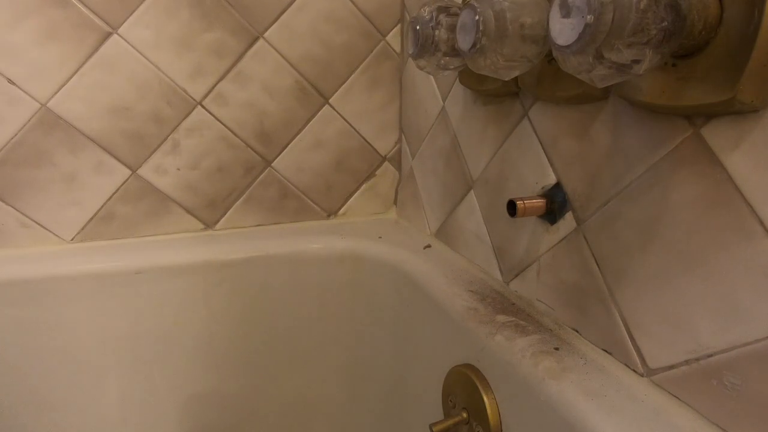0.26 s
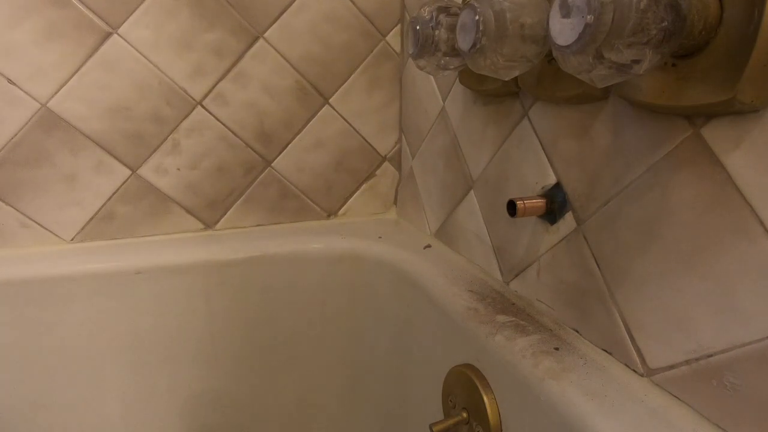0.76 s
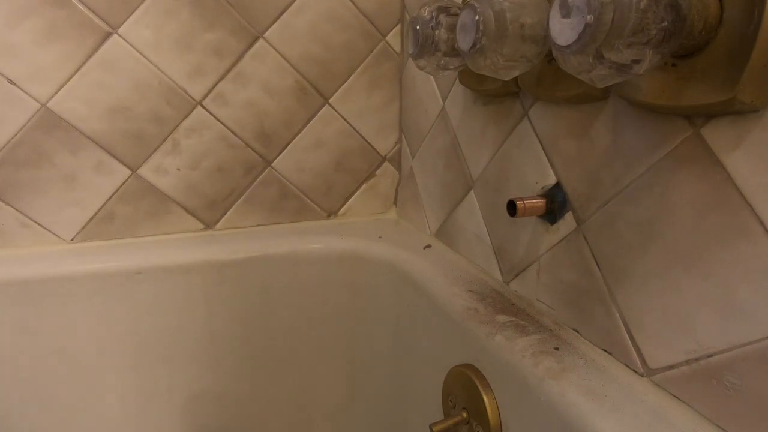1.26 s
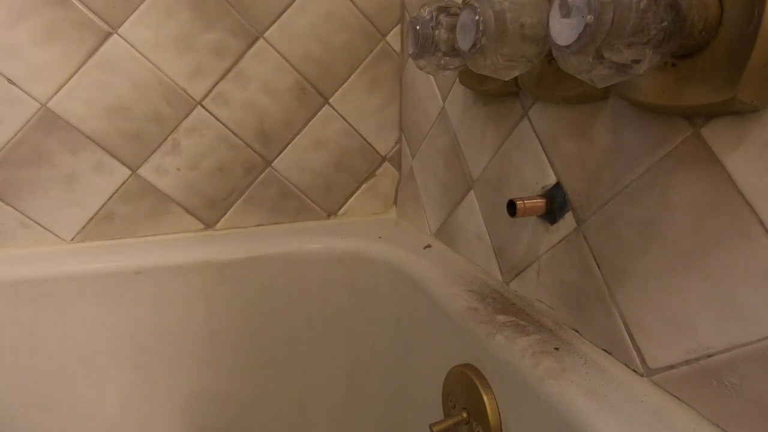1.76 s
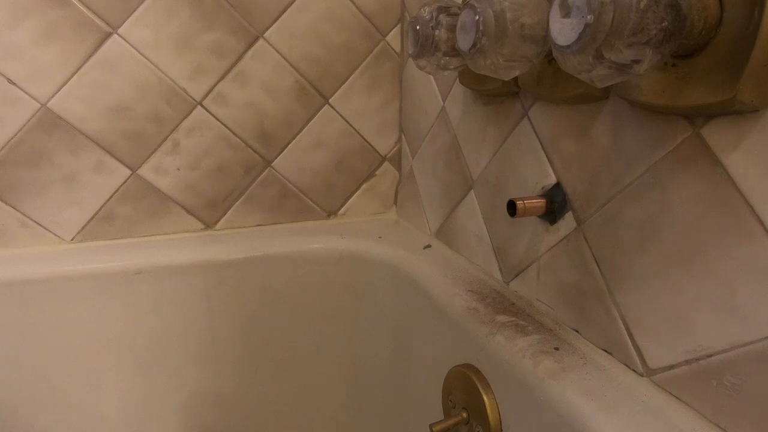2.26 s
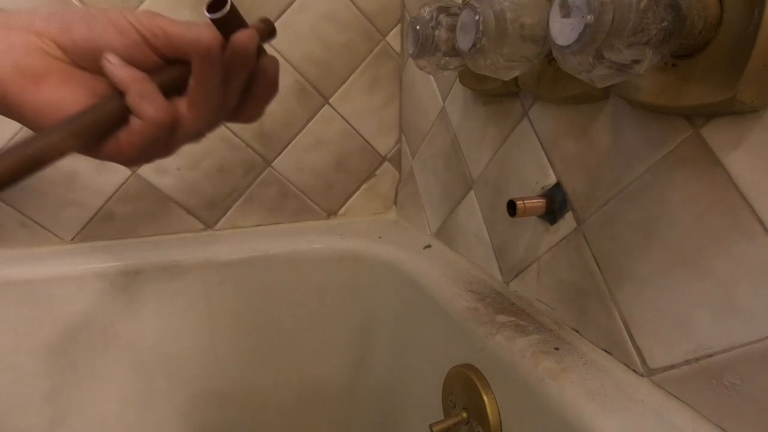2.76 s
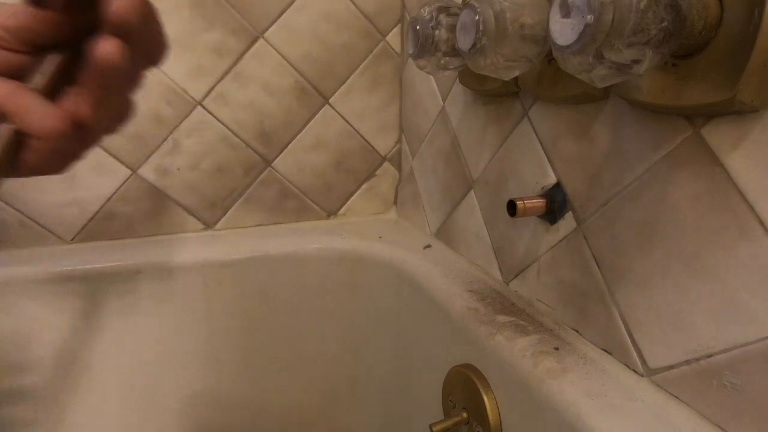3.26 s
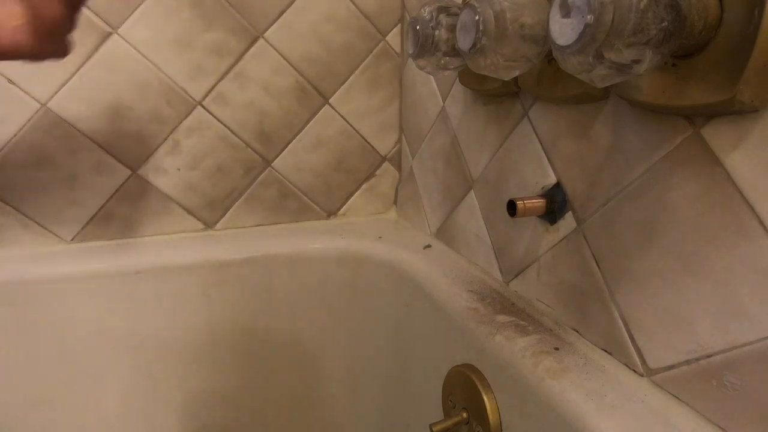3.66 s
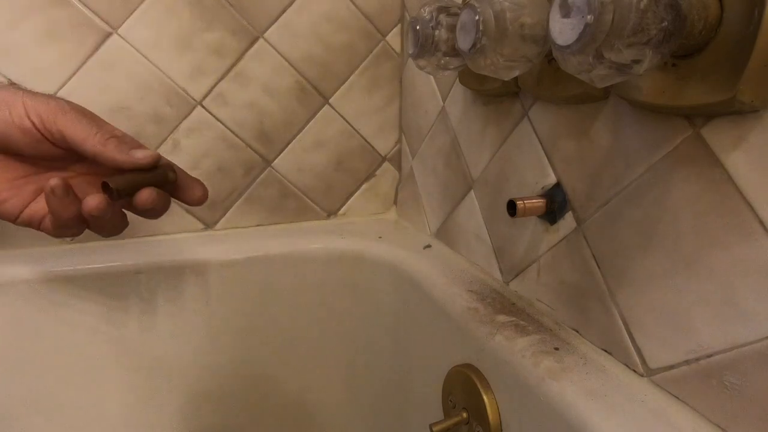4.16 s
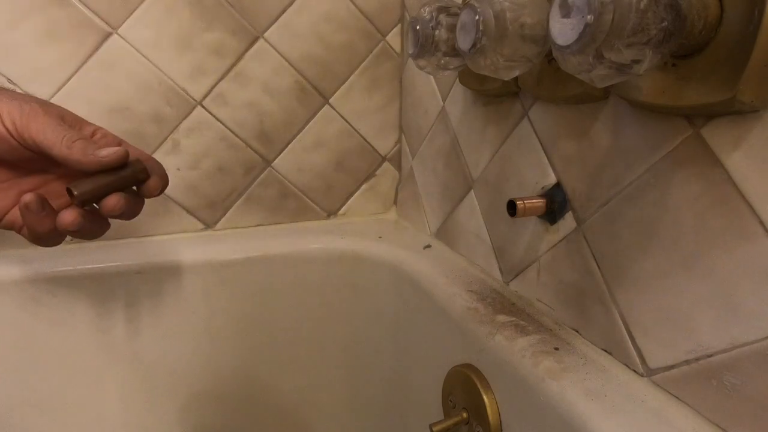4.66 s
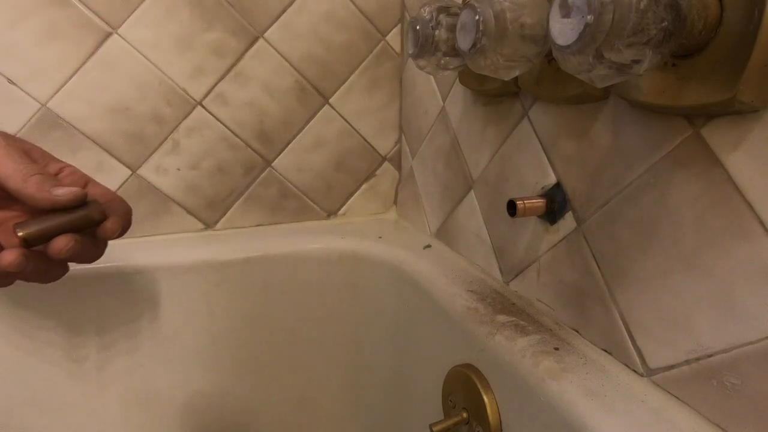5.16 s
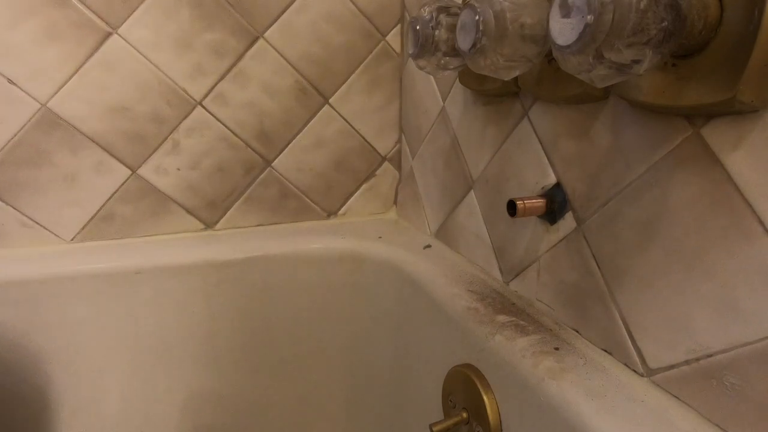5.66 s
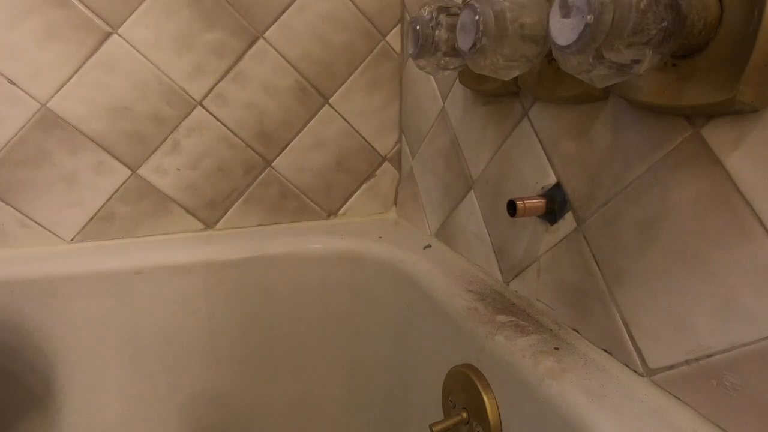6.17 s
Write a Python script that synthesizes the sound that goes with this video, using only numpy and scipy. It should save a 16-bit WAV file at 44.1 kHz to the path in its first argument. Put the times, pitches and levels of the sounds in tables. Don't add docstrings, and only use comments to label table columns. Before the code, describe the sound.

In a small tiled bathroom, metallic clicks and a hard pipe knock lead to two short singing scrapes on enamel, over deep building hum.

```python
import sys
import numpy as np
from scipy import signal
from scipy.fft import rfft, irfft, next_fast_len
from scipy.io import wavfile
from scipy.ndimage import uniform_filter1d, minimum_filter1d

SR = 44100
rng = np.random.default_rng(int(sys.argv[2]) if len(sys.argv) > 2 else 0)


def unload_wav(signal):
    wavfile.write(
        sys.argv[1],
        SR,
        np.round(np.clip(np.atleast_2d(signal).T, -1, 1) * 32767).astype(np.int16),
    )


def to_linear_factor(level_db):
    exponent = np.asarray(level_db, float) / 20
    return 10 ** exponent


N = 282681
TIME = np.arange(N) / SR
SIZE = next_fast_len(N + SR)
HZ = np.maximum(np.arange(SIZE // 2 + 1) * SR / SIZE, 1)
TREMOR = 1e-9 * rng.standard_normal(N)


def rms_one(x):
    return x / np.sqrt(np.mean(x ** 2) + 1e-20)


def filtered(x, order, hz, kind="low"):
    return signal.sosfilt(signal.butter(order, hz, kind, fs=SR, output="sos"), x)


def at_hz(rows, hz):
    f, *columns = np.transpose(rows)
    return [np.interp(np.log(hz), np.log(f), c) for c in columns]


def colour(x, spectrum):
    cepstrum = irfft(np.log(to_linear_factor(at_hz(spectrum, HZ)[0])), SIZE)
    cepstrum[1:SIZE // 2] *= 2
    cepstrum[SIZE // 2 + 1:] = 0
    gain = np.exp(rfft(cepstrum))
    gain = gain / np.sqrt(np.mean(abs(gain) ** 2))
    return irfft(rfft(x, SIZE) * gain, SIZE)[:N]


def resonance(x, hz, width):
    r = np.exp(-np.pi * width / SR)
    zeros = np.sqrt((1 - r * r) / 2) * np.array([1, 0, -1])
    poles = [1, -2 * r * np.cos(2 * np.pi * hz / SR), r * r]
    return signal.lfilter(zeros, poles, x + TREMOR[:len(x)])


def drift(hz):
    return rms_one(filtered(rng.standard_normal(N + SR), 2, hz)[SR:])


def grains(per_s, spread_db):
    sizes = to_linear_factor(spread_db * np.minimum(rng.exponential(1, N), 5)) * rng.choice([-1, 1], N)
    return rms_one(sizes * (rng.random(N) < per_s / SR))


def contacts(times, levels_db, length, rough):
    jolts, blows, age = np.zeros(N + SR), np.zeros(N), TIME[:SR // 5]
    for s, db in zip(times, levels_db):
        jolts[int(s * SR):][:len(age)] += to_linear_factor(db) * np.exp(-age / length)
        blows[int(s * SR)] += to_linear_factor(db) * np.sqrt(length * SR / 2)
    return rough * jolts[:N] * rng.standard_normal(N) + np.sqrt(1 - rough ** 2) * blows


def swells(rows):
    s, half, db = np.transpose(rows)[:3, :, None]
    return db - 12 * (abs(TIME - s) / half) ** 1.5


def stroke(start, hold, db):
    landing_s, lift_db_per_s = 0.0077, 332.5
    landing = 45 * np.maximum(start - TIME, 0) / landing_s
    return db - landing - lift_db_per_s * np.maximum(TIME - start - hold, 0)


def loudest(levels_db, *traits):
    lead = np.argmax(levels_db, axis=0)
    lent = [uniform_filter1d(np.asarray(trait, float)[lead], size=400) for trait in traits]
    return [np.max(levels_db, axis=0)] + lent


# f/Hz, level/dB per Hz
HUSH = [(20, -19.5), (54, -4.5), (111, -1.5), (147, -23.5), (225, -25), (377, -35.5), (571, -51.5),
        (818, -41.5), (1020, -51.5), (2400, -59), (5000, -60), (6100, -58), (7500, -65.5), (13000, -71.5),
        (14000, -90.5)]


def hush():
    out = to_linear_factor(-40.5) * np.array([colour(rng.standard_normal(N), HUSH) for field in range(2)])
    low_band = signal.butter(2, [48, 130], "band", fs=SR, output="sos")
    return out - 0.72 * signal.sosfiltfilt(low_band, out)


# t/s, half length/s, level/dB, f/Hz
FIRST_MODE_SWELLS = [(0.02, .07, -34.5, 62.2), (.46, .07, -40.5, 57.1), (.61, 0.041, -32, 65.5),
                     (.86, 0.19, -38.5, 62.4), (1.23, 0.031, -30, 62), (1.52, 0.11, -43.5, 60.76),
                     (1.75, .12, -46, 59.3), (2.0, .14, -37.5, 65.4), (2.31, .05, -47.5, 69.97),
                     (2.51, .08, -33.5, 64.6), (2.6, .06, -31.5, 72), (2.78, 0.13, -37, 63),
                     (3.0, 0.073, -34.5, 64.16), (3.18, .04, -37.5, 61.6), (3.41, 0.0496, -43, 61.03),
                     (3.62, 0.028, -53.5, 61.95), (3.95, 0.091, -37, 63), (4.22, 0.078, -37, 63.82),
                     (4.53, .13, -39, 64.74), (4.75, .06, -38.5, 66), (5.47, 0.14, -46.5, 65),
                     (5.77, 0.044, -34, 64.47), (5.93, .06, -33.5, 62.6), (6.2, 0.12, -45, 57),
                     (6.41, 0.088, -29.5, 52)]
# t/s, half length/s, level/dB, f/Hz
SECOND_MODE_SWELLS = [(0.001, 0.033, -39.5, 96.42), (0.379, 0.11, -48.5, 111.6),
                      (0.618, 0.058, -42.5, 111.5), (0.833, 0.19, -42.5, 105.6), (1.021, 0.076, -46, 110.3),
                      (1.301, 0.075, -51, 110.4), (1.538, 0.049, -41.5, 107.1), (1.845, 0.17, -47.5, 114),
                      (2.156, 0.056, -39, 109.9), (2.401, 0.13, -47.5, 104), (2.611, 0.034, -19, 101.3),
                      (2.757, 0.23, -43, 111.1), (3.181, 0.035, -38.5, 112.6), (3.418, 0.047, -50.5, 97.97),
                      (3.617, 0.049, -51.5, 119.8), (3.946, 0.12, -38.5, 101.6), (4.239, 0.052, -43, 114.2),
                      (4.551, 0.15, -45.5, 109.1), (4.826, 0.045, -42.5, 93.95), (5.093, .07, -44.5, 96.8),
                      (5.47, 0.091, -49.5, 120.1), (5.708, 0.11, -43.5, 114.3), (5.879, 0.1, -39.5, 100.2),
                      (6.142, 0.031, -36.5, 103.9), (6.41, 0.033, -34, 101.6)]


def rumble():
    rest_db = -59
    out = 0
    for rows in (FIRST_MODE_SWELLS, SECOND_MODE_SWELLS):
        db, hz = loudest(swells(rows), np.transpose(rows)[3])
        level = to_linear_factor(np.maximum(db, rest_db) + 5.06 * drift(26.7))
        out = out + level * np.sin(2 * np.pi * np.cumsum(hz + 2.0 * drift(7.9)) / SR)
    return out * [[1], [.15]]


# t/s, half length/s, level/dB, centre f/Hz
RUSTLES = [(0.001, 0.0049, -36.5, 2920), (.12, .04, -75, 2200), (0.208, 0.033, -54, 2310),
           (0.334, 0.017, -54.5, 2120), (0.388, 0.028, -60, 1980), (0.513, 0.026, -71, 3080),
           (3.475, 0.085, -73, 4940), (3.594, 0.044, -67, 5340), (3.804, 0.063, -77.5, 5960),
           (5.361, .045, -65.5, 1180), (5.469, 0.069, -76, 1310), (5.777, .2, -78.5, 1100),
           (6.007, 0.032, -67.5, 1410), (6.214, 0.02, -61.5, 1825), (6.35, 0.047, -64, 1500)]


def cloth():
    level_db, centre_hz = loudest(swells(RUSTLES), np.transpose(RUSTLES)[3])
    slips = to_linear_factor(level_db - 16) * grains(per_s=5000, spread_db=2.5)
    out = np.zeros(N)
    for hz in np.geomspace(700, 7500, 13):
        share = np.exp(-(np.log2(hz / centre_hz) / .35) ** 2)
        band = resonance(resonance(share * slips, hz, .3 * hz), hz, .3 * hz)
        out += band * np.sqrt(hz / 2000)
    return out


# t/s, f/Hz, level/dB, t60/s
METAL_RINGS = [(0.021, 5500, -37, 0.0067), (.072, 5130, -33.5, 0.015), (4.535, 2625, -33, 0.22),
               (4.565, 2640, -30.5, 0.11), (4.42, 2621, -40.5, .25), (4.42, 3000, -34.5, .02),
               (5.045, 2615, -50, 0.32), (4.9, 2615, -66, .26), (5.345, 4858, -59.5, 0.17),
               (5.345, 6051, -56, .2), (5.345, 5987, -60, .2), (5.345, 7553, -56.5, 0.17),
               (5.345, 7595, -62, .2), (4.72, 2621, -35, 0.43), (4.86, 2621, -39, .3),
               (5.042, 1446, -40, 0.027), (0.016, 2380, -29.5, 0.016), (.072, 1970, -30, 0.019),
               (0.072, 2470, -32.5, 0.03), (.072, 3360, -29.5, 0.018), (0.074, 6460, -25.5, 0.0074),
               (.073, 12750, -40, 0.008), (.02, 12800, -56, .008), (.073, 6600, -39, .004),
               (4.421, 850, -45.5, 0.4), (0.924, 7200, -38.5, 0.0078), (1.007, 5270, -38.5, 0.0078),
               (0.93, 5200, -44.5, .008), (1.266, 2500, -70.5, 0.56), (1.36, 2490, -72, 0.26),
               (2.572, 4880, -23.5, 0.032), (2.571, 1600, -32, 0.0045), (4.365, 973, -46, 0.3),
               (5.035, 996, -44, 0.19), (5.09, 1276, -41, 0.028), (5.347, 969, -58.5, 0.11),
               (6.245, 1500, -47, 0.059), (6.245, 1544, -44.5, 0.055), (6.246, 1830, -46.5, 0.028),
               (6.244, 2570, -43.5, 0.062), (6.243, 2933, -43.5, 0.017), (6.246, 3290, -44.5, 0.029),
               (6.244, 4700, -60, 0.023), (6.242, 5180, -54, 0.0091), (6.292, 1448, -57, 0.16)]


def metal_rings():
    out = np.zeros(N)
    for s, hz, db, t60 in METAL_RINGS:
        age = TIME[:min(SR // 2, N - int(s * SR))]
        out[int(s * SR):][:len(age)] += to_linear_factor(db - 60 * age / t60) * np.sin(2 * np.pi * hz * age)
    return out


# body level/dB, wheel level/dB, screw level/dB
TOOL_TICKS = [(0.0169, -32.5, 1, -8, -2), (0.0713, -20, -15, -14, -14), (0.087, -41, -12, -6, -4),
              (0.101, -41, -10, -10, -13), (0.5294, -53, -8, -8, -10), (0.9245, -39.5, -5, -4, -5),
              (0.932, -41, -6, -10, -10), (0.924, -60, -5, 0, 3), (1.0075, -38, -3.5, -11, -14),
              (1.124, -40.5, -12, 3.5, -5.5), (1.281, -54.5, -5.5, 3, -12), (1.29, -52, -5.5, 0, -12),
              (1.312, -58, -5.5, 1, -12)]
TOOL_PART_EDGES = [1100, 2000, 4000, 6000, 8300]


def tool():
    s, jaw_db, body_db, wheel_db, screw_db = np.transpose(TOOL_TICKS)
    parts_db = body_db, 0, wheel_db, screw_db
    out = metal_rings()
    for low, high, part_db in zip(TOOL_PART_EDGES, TOOL_PART_EDGES[1:], parts_db):
        jolts = contacts(s, jaw_db + part_db + 2.5, length=0.0026, rough=0.66)
        out += filtered(jolts, 3, [low, high], "band")
    return signal.sosfilt(signal.cheby2(10, 60, 13600, fs=SR, output="sos"), out)


# f/Hz, level/dB, t60/s
TUB_MODES = [(62, -15, 1), (92.4, 0, 0.23), (163, -8.5, 0.11), (199.3, -14.5, 0.2), (237.7, -4.5, 0.4),
             (302.5, -6.5, 0.11), (343.5, -11, 0.2), (376.7, -11, 0.13), (416, -14, 0.05)]


def tub(force):
    boom = np.zeros(N)
    for k, (hz, db, t60) in enumerate(TUB_MODES):
        boom += to_linear_factor(db) * (-1) ** k * resonance(force, hz, 2.2 / t60)
    return filtered(boom, 4, 2500)


# boom level/dB, body level/dB, treble level/dB
TUB_KNOCKS = [(2.084, -39, -3, -12, -1), (2.107, -35, 3, -3, -3.5), (2.3836, -35, -10.5, -12.5, -5.5),
              (2.439, -43.5, 2, -10.5, -1.5), (2.5685, -11.5, -6.5, -13, -10),
              (4.362, -42.5, -9, -13.5, -4), (4.418, -36.5, -11.5, -11, -1), (4.6781, -29, -15, -11.5, -1),
              (5.0, -49.5, -2.5, -7.5, -15), (5.038, -48, -4, -6, -6), (5.114, -52, -25.5, -1, -14)]
# f/Hz, level/dB per Hz
BODY_SPECTRUM = [(250, -29.5), (400, 2.5), (600, 1), (900, 2), (1200, -4.5), (1600, -39.5), (5000, -100)]
# f/Hz, level/dB per Hz
SLAP_SPECTRUM = [(500, -25), (800, -4), (1250, 9.5), (1800, 5.5), (2500, 7), (3200, 4.5), (4000, -2.5),
                 (5000, -35), (8000, -101)]
# f/Hz, level/dB per Hz
CRACK_SPECTRUM = [(3000, -25), (4200, -4), (5500, -4), (7000, -6), (7900, -13), (8500, -33), (10000, -38),
                  (12800, -30), (13200, -75), (16000, -110)]


def knocks():
    s, peak_db, boom_db, body_db, treble_db = np.transpose(TUB_KNOCKS)
    contact_s = 0.013
    boom = tub(contacts(s, peak_db + boom_db + 5.0, contact_s, rough=.3))
    body = colour(contacts(s, peak_db + body_db + 2.0, contact_s, rough=.55), BODY_SPECTRUM)
    slap = colour(contacts(s, peak_db - 5.0, contact_s, rough=.82), SLAP_SPECTRUM)
    crack = colour(contacts(s, peak_db + treble_db - 10.0, contact_s, rough=0.99), CRACK_SPECTRUM)
    return boom + body + slap + crack


PIPE_MODES = [2621, 7080, 4834, 4858, 5987, 6051, 6142, 6378, 6792, 7465, 7553, 7595, 8439, 9674, 9730,
              10270, 10507, 11120, 11300, 12738, 12890, 13080, 13500, 13640, 14280, 14500, 14660]
# width/Hz, level/dB
PIPE_WIDTHS = [(16.14, -8), (220, -20), (20.5, -12.5), (17.1, 1), (25.3, -3.5), (16.2, 0), (20, -14.5),
               (24.89, -9), (22.4, -9.5), (40, -8), (18, -5.5), (19.4, -7.5), (24, -17.5), (22.4, -19.5),
               (18.2, -27), (129.7, -30), (22, -21.5), (24, -26), (129.9, -29), (20, -28.5), (24.1, -38),
               (30, -35), (25.56, -37), (25.96, -35), (45, -33), (40, -34), (40.05, -32)]


def pipe(force, oval_db, top_db, damping=1):
    held = slice(int(2.8 * SR), None)
    plain, oval, top = force[held], (to_linear_factor(oval_db) * force)[held], (to_linear_factor(top_db) * force)[held]
    out = np.zeros(N)
    for hz, (width, db) in zip(PIPE_MODES, PIPE_WIDTHS):
        wide = max(width, 12) * damping
        drive = oval if 4000 < hz < 5500 else top if hz > 9000 else plain
        gain = to_linear_factor(db) * wide / 1000 * np.sqrt(SR / wide) / 8
        out[held] += gain * resonance(resonance(drive, hz, wide), hz, 5 * wide)
    return out


# t/s, half length/s, level/dB, oval modes level/dB
FINGER_SLIDES = [
    (3.019, .2, -89.5, -7.5),
    (3.5, 0.1, -86.5, -2),
    (3.597, 0.029, -78, 2.5),
    (3.791, 0.073, -95, -0.5),
    (5.606, 0.17, -93.5, -8),
    (5.83, 0.034, -84, -14),
]


def fingers():
    flick_s, flick_db, flick_oval_db = 5.342, -80, -12
    levels_db = np.vstack([swells(FINGER_SLIDES), stroke(flick_s, 0.018, flick_db)])
    rub_db, oval_db = loudest(levels_db, [row[3] for row in FINGER_SLIDES] + [flick_oval_db])
    nail = rng.standard_normal(N)
    fingertip = filtered(nail, 6, 6700)
    touch = np.where(abs(TIME - flick_s) < .1, nail, fingertip)
    return pipe(to_linear_factor(rub_db + 5) * touch, oval_db, top_db=-8, damping=3.5)


# start t/s, hold/s, pressure level/dB, grit level/dB, oval modes level/dB
RIM_STROKES = [
    (4.36, .008, -46, 3.5, -16),
    (4.419, 0.067, -39.5, -0.5, 4.5),
    (4.513, 0.038, -33.5, -5, 2),
    (4.565, 0.034, -49.5, -5.5, -4.5),
    (4.672, 0.039, -26, -5, 5.5),
    (4.742, 0.069, -28.5, -10.5, -7.5),
    (4.922, 0.053, -58, -3, -14),
    (5.035, 0.016, -58.5, 1.5, -17),
    (5.054, 0.061, -77.5, 10, -18),
]
# t/s, peak level/dB
RIM_TAPS = [
    (4.362, -41),
    (4.417, -26.5),
    (4.567, -38.5),
    (4.676, -18),
]
# f/Hz, level/dB per Hz
GRIT_SPECTRUM = [(250, -42), (420, 3.5), (600, -5.5), (1200, -3.5), (2500, -2), (3500, -4.5), (4200, -17),
                 (5400, -27), (6500, -22.5), (7100, -9.5), (8200, -30.5), (9000, -41.5), (11500, -62.5),
                 (15000, -80.5)]


def drag():
    start, hold, db, grit, oval = np.transpose(RIM_STROKES)
    ring_db, grit_db, oval_db = loudest(stroke(start[:, None], hold[:, None], db[:, None]), grit, oval)
    over_db = ring_db + 36.5
    top_db = 0.5 + 0.45 * np.maximum(over_db, -40)
    tub_db = np.minimum(-35 + 0.49 * over_db, ring_db + 17.5)
    slips = grains(per_s=3700, spread_db=4.5) * to_linear_factor(1.7 * drift(21))
    s, tap_db = np.transpose(RIM_TAPS)
    taps = contacts(s, tap_db + 8.5, length=0.0014, rough=0.39)
    song = pipe(to_linear_factor(ring_db + 1.0) * slips + taps, oval_db, top_db)
    scrape = colour(to_linear_factor(ring_db + grit_db) * slips, GRIT_SPECTRUM)
    return song + scrape + tub(to_linear_factor(tub_db - 5.5) * slips + to_linear_factor(1.0) * taps)


# f/Hz, t60/s
ROOM_DECAY = [(100, 0.17), (300, 0.32), (1000, 0.36), (3000, 0.31), (8000, 0.31), (14000, 0.27)]


def room(dry):
    t, edges = TIME[:SR], 40 * 2 ** np.arange(0, 9.1, .5)
    tails, white = 0, rng.standard_normal((2, 2, SR))
    for k, (low, high) in enumerate(zip(edges, edges[1:])):
        band = filtered(white[k % 2], 2, [low, high], "band")
        tails = tails + band * to_linear_factor(-60 * t / at_hz(ROOM_DECAY, np.sqrt(low * high))[0])
    tails = tails * np.clip((t - .001) / 0.0079, 0, 1)
    tails[0, 0] += to_linear_factor(-0.5) * np.sqrt(np.sum(tails[0] ** 2))
    tails = tails / np.sqrt(np.sum(tails ** 2, axis=1, keepdims=True))
    return signal.fftconvolve(dry[None], tails, axes=1)[:, :N]


# f/Hz, likeness/0-1, right phase/rad, left minus right level/dB
AIR_AT_PORTS = [(60, .96, 0, -8.5), (120, .9, -.2, -7.5), (250, .4, -1.8, -5), (550, .82, -3.0, -1.5),
                (1300, .7, -3.0, 0), (2400, .2, -2.3, 0), (3800, .42, -.4, -1), (5200, .15, 0, -2.5),
                (7500, .05, 0, 1.5), (14000, .03, 0, 0)]
# f/Hz, likeness/0-1, right phase/rad, left minus right level/dB
NEAR_AT_PORTS = [(60, .92, 0, -10), (120, .88, -.2, -9), (350, .85, -1.1, -7), (550, .85, -3.0, -3),
                 (750, .6, -3.6, -6), (950, .3, -1.0, -4.5), (1400, .45, -1.5, -3.5), (2200, .6, -1, 0),
                 (3400, .65, -.5, -1), (4800, .55, .5, -5.5), (7500, .3, 1.2, -1), (9500, .6, 2.1, -2),
                 (14000, .4, 1.6, 0)]


def ports(pair, table):
    alike, phase, left_db = at_hz(table, HZ)
    alike = np.clip(alike, 0, .99)
    turn = to_linear_factor(-left_db) * np.exp(1j * phase)
    even = 2 / np.sqrt(abs(1 + turn * alike) ** 2 + abs(turn) ** 2 * (1 - alike ** 2))
    first, second = rfft(pair, SIZE)
    right = turn * (alike * first + np.sqrt(1 - alike ** 2) * second)
    return irfft(even * np.array([first, right]), SIZE)[:, :N]


def scene():
    near = cloth() + tool() + knocks() + fingers() + drag()
    return ports(room(near), NEAR_AT_PORTS) + ports(hush() + rumble(), AIR_AT_PORTS)


def roll_off(x):
    return signal.sosfilt(signal.butter(12, 15480, fs=SR, output="sos"), x)


def record(dry):
    peaks = -minimum_filter1d(-abs(dry).max(0), size=400)
    level = uniform_filter1d(peaks, size=200)
    held = dry / (1 + (level / .45) ** 4) ** .25
    return roll_off(held)


dry = scene()
out = record(dry)
unload_wav(out)
```